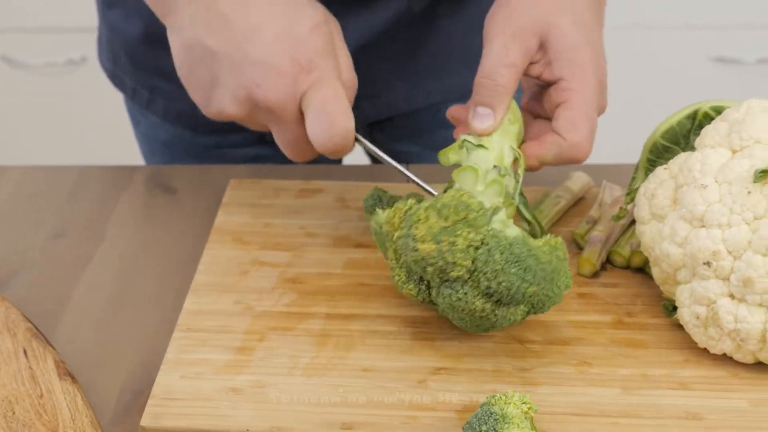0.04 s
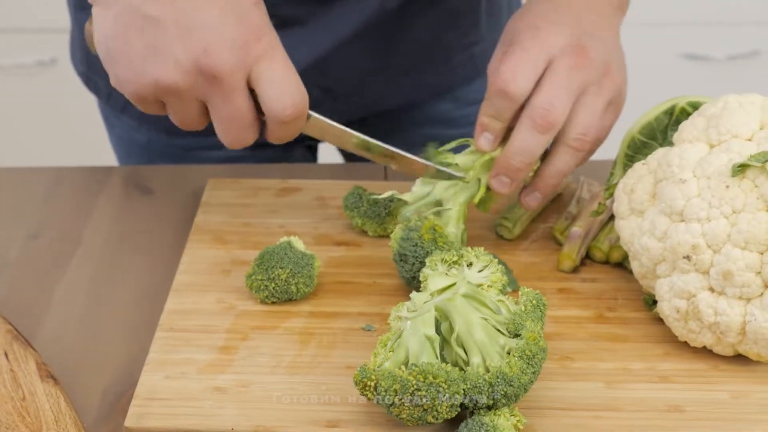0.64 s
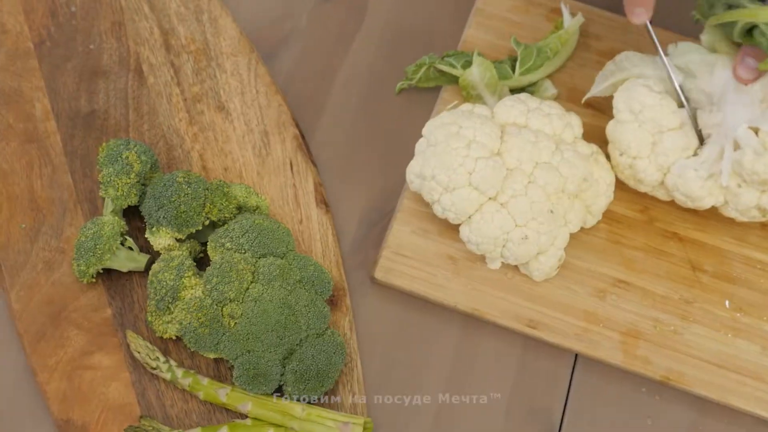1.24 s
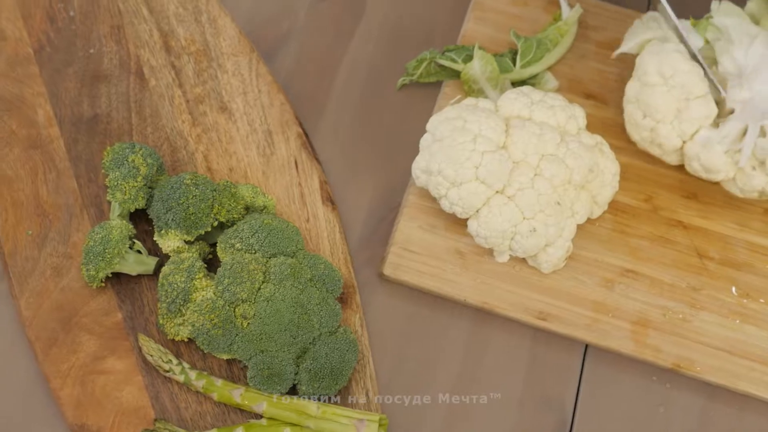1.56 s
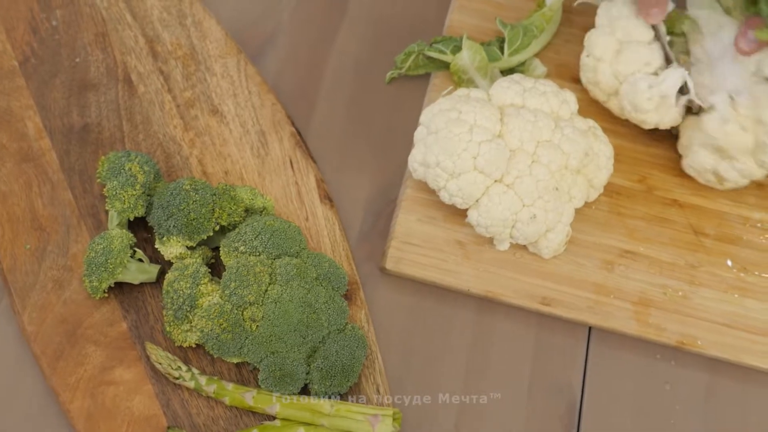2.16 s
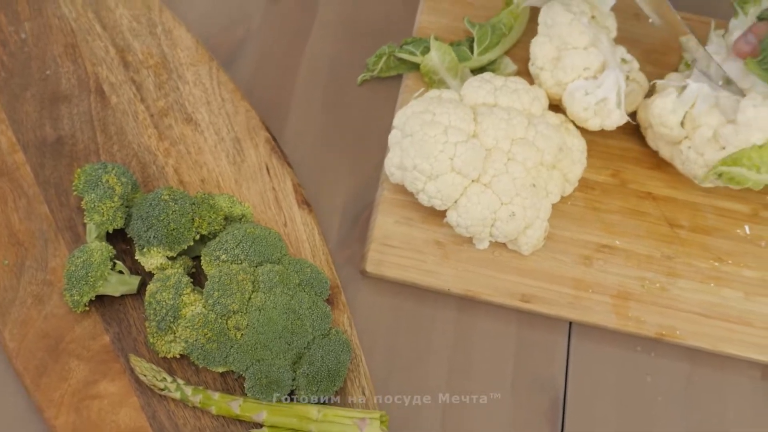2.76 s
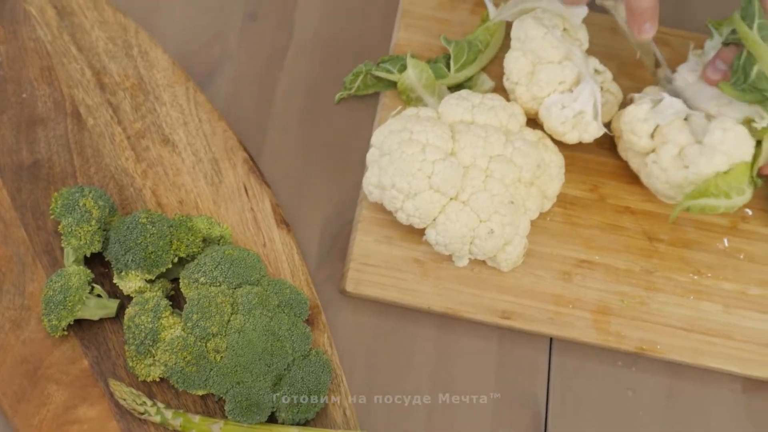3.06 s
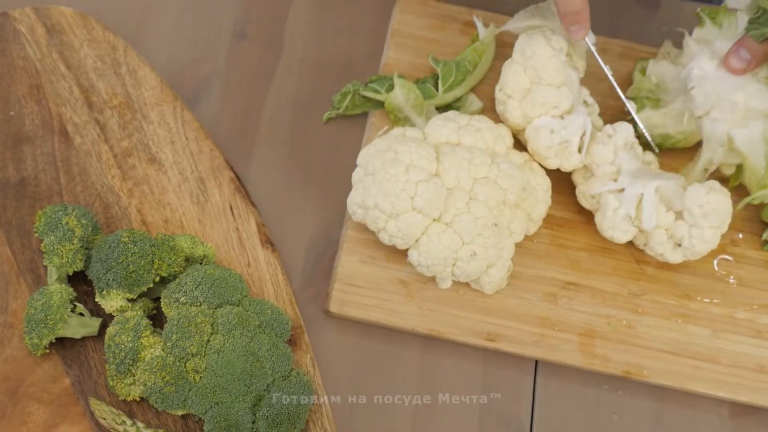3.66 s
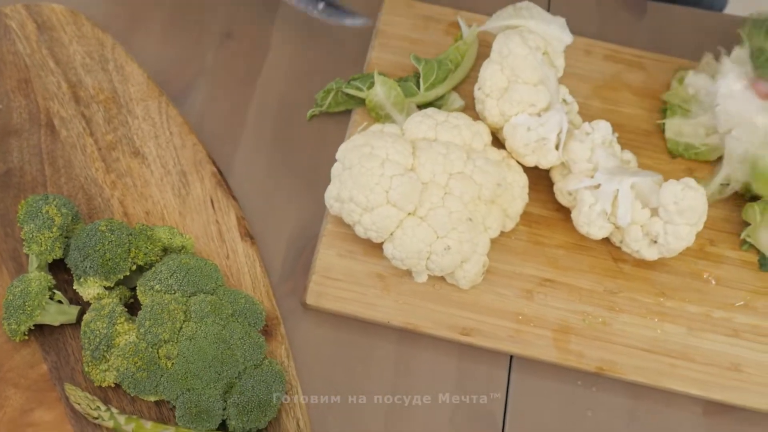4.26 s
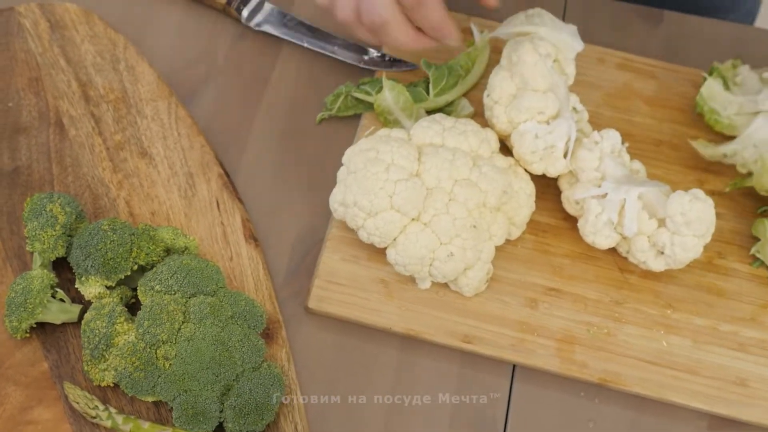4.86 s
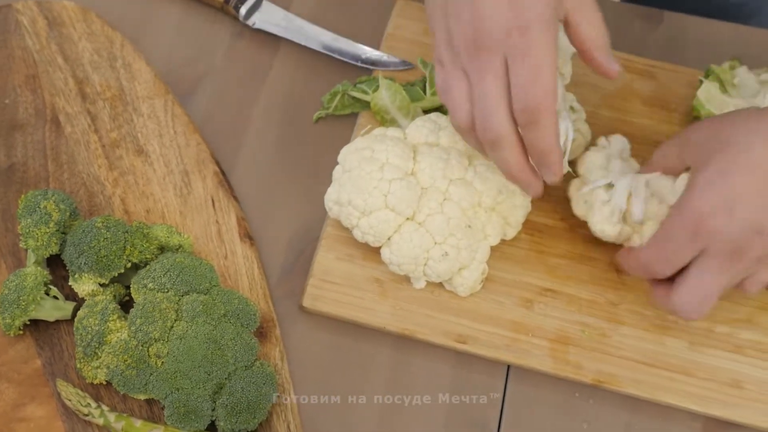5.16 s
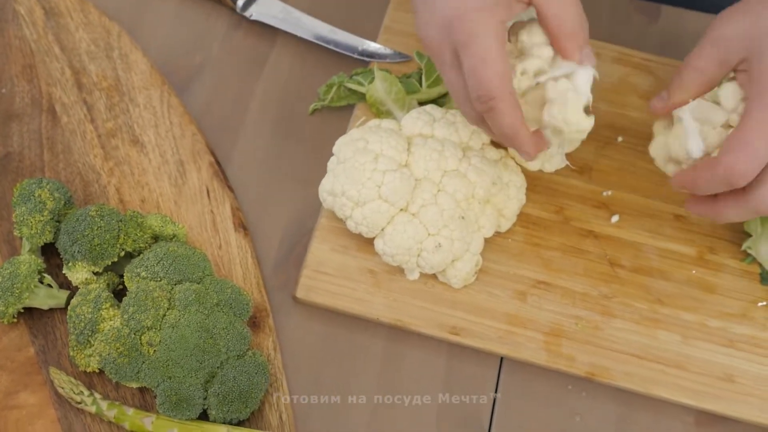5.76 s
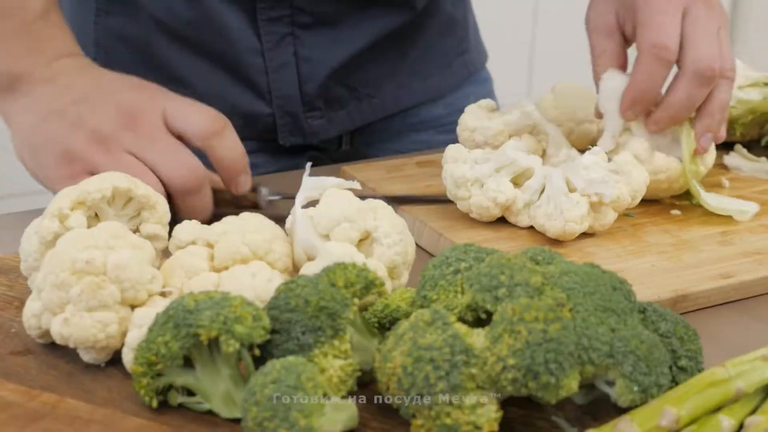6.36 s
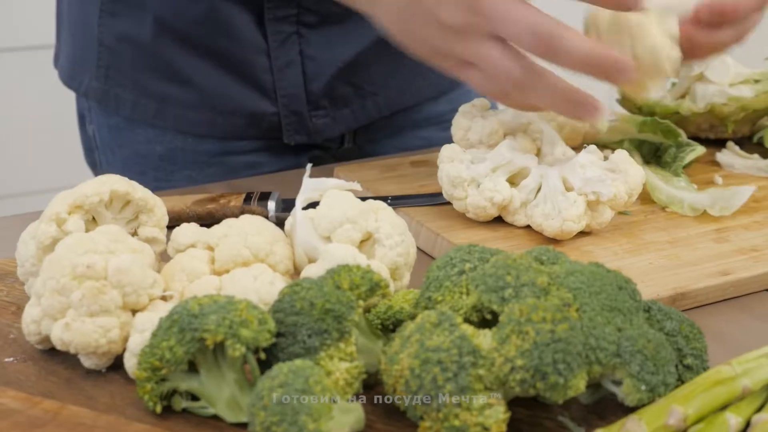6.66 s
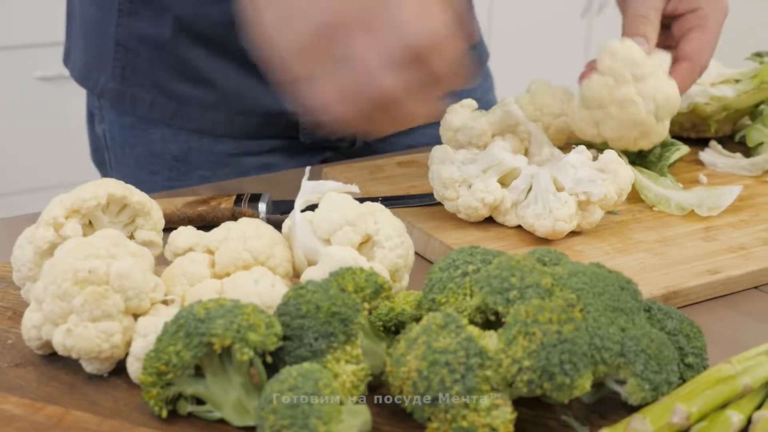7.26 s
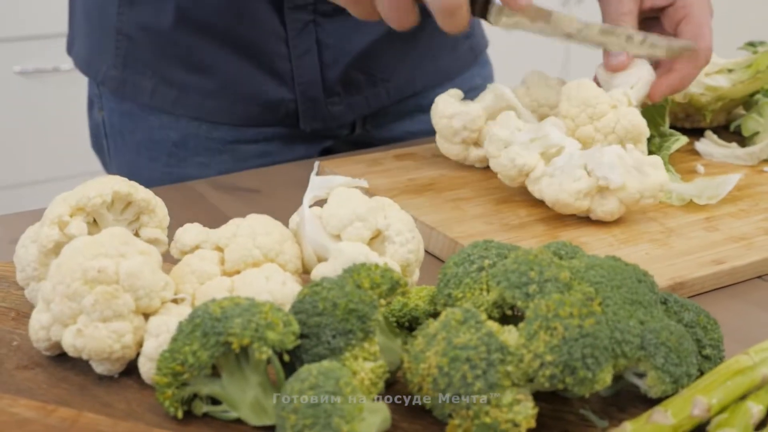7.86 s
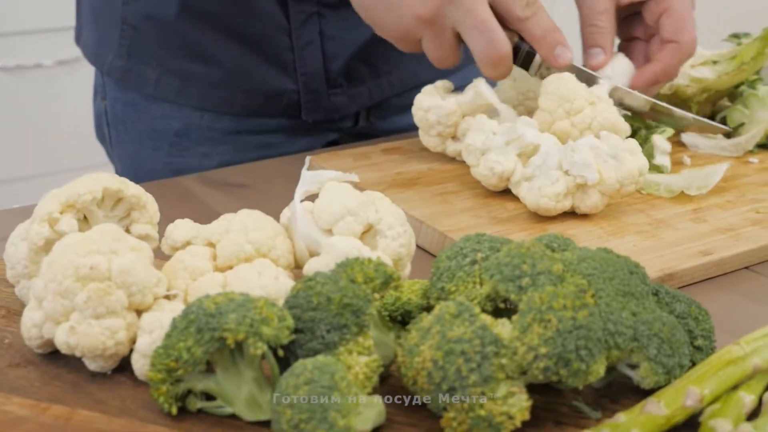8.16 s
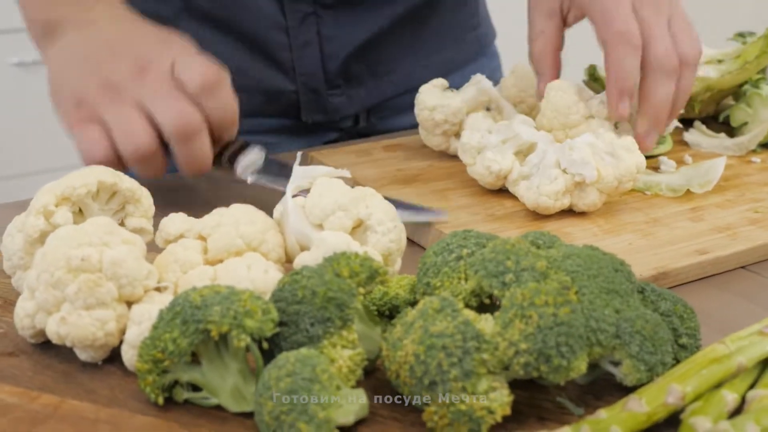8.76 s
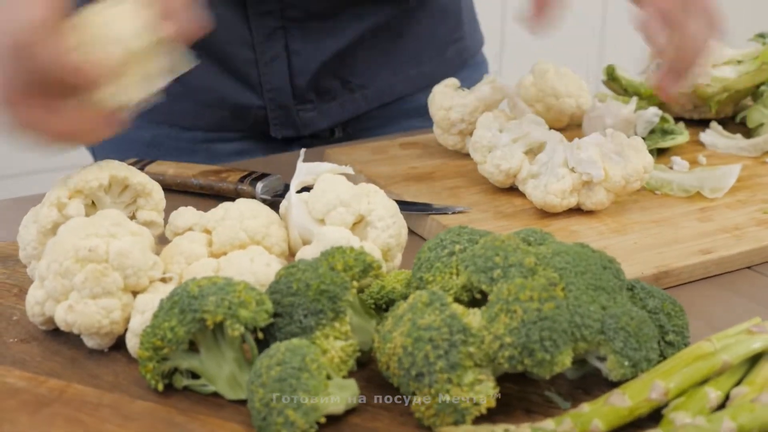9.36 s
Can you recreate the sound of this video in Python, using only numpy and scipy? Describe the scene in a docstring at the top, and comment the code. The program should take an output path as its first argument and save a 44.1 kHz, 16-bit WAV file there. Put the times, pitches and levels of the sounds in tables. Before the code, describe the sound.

A quiet kitchen holds a faint steady fan, a low electrical hum and a thin whine. From the start to about 3.5 seconds, a knife cuts broccoli and cauliflower stalks with faint, irregular crunches, a few tiny squeaks of the blade and dull, hollow bumps on a wooden board. At about 4.5 seconds the knife is laid down with a short clatter of steel on wood. A soft bump follows, then small crisp snaps around 5.6 seconds as a floret is broken by hand. At 6.4 seconds a soft push and two quick dry taps run into one loud, close knock that briefly rings the table, the loudest sound. The knife is picked up with light knocks at 7.5 seconds, and two very faint cuts and soft bumps follow until 8.4. Near 9 seconds the knife is set down again, rattling and knocking on the wood.

```python
"""A quiet kitchen: broccoli and cauliflower are cut and snapped into florets on a wooden board.
Stalks crunch faintly as their cells burst, and squeak on the blade. Board and table give dull bumps.
The knife is laid down twice, ringing steel and wood. A soft push and two dead taps lead into
one loud, close knock that rings the table. Mains hum, a faint fan and a thin whine lie underneath."""
import sys
import numpy as np
from scipy import signal
from scipy.fft import rfft, irfft, next_fast_len
from scipy.io import wavfile

SR = 44100
rng = np.random.default_rng(int(sys.argv[2]) if len(sys.argv) > 2 else 0)


def wav_out(sig):
    """Save sig, one row per channel (or a flat mono array), as 16-bit PCM at SR to the path in sys.argv[1]."""
    wavfile.write(sys.argv[1], SR, np.round(np.clip(np.atleast_2d(sig).T, -1, 1) * 32767).astype(np.int16))


N = 424241
TOP_HZ = 15800
EVENT_TIME_S = np.arange(-int(.1 * SR), int(.33 * SR)) / SR  # zero at the event's peak

# noise spectra, shape only: freq_hz, density_db
AIR_SPECTRUM = [(15, -27.5), (28, -18), (50, -14), (70, -10.5), (95, -1.5), (150, -6.5), (220, -10.5),
                (400, -7.5), (650, -9), (1050, -9), (1700, -14.5), (3200, -16.5), (4200, -17.5),
                (7100, -20.5), (9500, -23), (11500, -28), (15500, -31)]
CELL_SPECTRUM = [(100, -3), (400, -4), (900, -5), (2200, -2.5), (3400, -1), (4600, -3.5), (7500, -3),
                 (11000, -11), (15500, -20)]
WOOD_SPECTRUM = [(50, -28.5), (125, -13), (190, -23.5), (340, -2), (460, -7.5), (640, 0.5), (950, -1),
                 (1250, -1.5), (1900, -17.5), (3300, -7.5), (4700, -30.5), (8500, -13.5), (12000, -13),
                 (16000, -54)]
HOLLOW_SPECTRUM = [(120, -20), (220, -16), (330, -3), (420, -5), (560, -13), (1100, -28)]
STEEL_SPECTRUM = [(500, -37), (1400, 2), (2000, 3.5), (3600, 1.5), (4900, -6), (5800, 0.5), (7200, -16.5),
                  (9000, -3), (12000, -34), (16000, -31.5)]
CRACKLE_SPECTRUM = [(40, -21), (200, -3), (700, 9.5), (1500, -9), (4000, -8.5), (8000, -18), (16000, -19)]
KNOCK_SPECTRUM = [(50, -32.5), (125, -13), (190, -12.5), (300, -9), (400, -11), (560, 7), (720, -3.5),
                  (980, -4.5), (1350, -2.5), (1550, -5), (1950, -12.5), (3800, -14), (5200, -24.5),
                  (8500, -33), (11500, -45.5), (16000, -52)]
# left-right likeness of air, roomy sound and near sound: freq_hz, correlation
AIR_CORRELATION = [(60, 0.68), (150, 0.29), (380, 0.09), (950, 0.075), (2380, 0.036), (5980, 0.045),
                   (15000, 0.03)]
ROOM_CORRELATION = [(60, 0.56), (200, -0.12), (1000, 0.012), (8000, 0.024)]
NEAR_CORRELATION = [(700, 1), (1300, .999), (2400, .93), (4400, 0.81), (8000, 0.52), (15000, 0.589)]
# clear modes of board and table, and of the blade: freq_hz, relative_db, base_t60_s
BOARD_MODES = [(127.3, -14.5, 0.27), (331.2, -9.5, 0.39), (367, -8.5, 0.34), (400.4, -1, 0.29),
               (533, -1, 0.28), (547, -2.5, 0.254), (619, 2, 0.21), (653.4, -7, 0.39), (737, 6, 0.3),
               (835, -1, 0.26), (915, -17.5, 0.18), (997, -19, 0.46), (1134, -9.5, 0.41),
               (1153, -2.5, 0.32), (1361, 0, 0.22), (1554, -3.5, 0.19)]
BLADE_MODES = [(1335, -11, 0.18), (1396, 1, 0.21), (2213, -4, 0.1), (2370, -9, .17), (2600, -7, .13),
               (2880, -18, 0.18), (3200, -10, 0.13), (3500, -6, .06), (3590, -1, 0.071), (3950, -12, .11),
               (6020, -23, .06), (6050, -9, .07), (7370, -27, .1), (8470, -20, 0.09)]
# ring time of wood and room: freq_hz, base_t60_s
RING_DECAY = [(100, .36), (400, 0.3), (1000, 0.34), (3000, 0.29), (7000, 0.26), (12000, .16)]
# fan resonances: centre_hz, width_hz, lift_db
FAN_RESONANCES = [(356, 17, 6), (601.4, 9.42, 12), (864, 55, 12), (987, 24, 10), (1034, 31, 7),
                  (1069, 33, 5), (1158, 25, 6), (1470, 6.1, 0), (2290, 190, 1), (3852, 110, 7),
                  (4997, 77, 5), (5620, 440, 4.5), (7040, 1200, -4.5), (7780, 200, 6), (9600, 1000, 8),
                  (10900, 50.3, 6), (15100, 4400, 4.5)]
# swell of the whine: time_s, relative_db
WHINE_ENVELOPE = [(0.0, -2.5), (2.2, -0.5), (3.6, -12.5), (4.8, 3), (6.2, -20), (6.6, -3.0), (7.6, 1),
                  (8.6, -3.5), (9.6, -8.0)]
# mains hum: pitch_hz, rms_db
HUM_TONES = [(50, -80.5), (100, -79.5)]
# stalks and leaves giving way: peak_s, level_db, sigma_s, tilt_db_per_octave
STALK_CRACKS = [(0.115, -58.5, 0.031, 4), (0.936, -60.5, 0.019, -5.5), (1.15, -57, 0.019, -3.5),
                (1.411, -62.5, 0.042, -3), (1.939, -53.5, 0.019, -1.5), (2.132, -59, .023, -0.5),
                (2.459, -59, .046, -1.5), (2.923, -54.5, 0.029, -1.5), (3.129, -56, .024, -0.5),
                (3.407, -56.5, 0.028, 1), (4.487, -59.5, 0.025, 7), (5.561, -62.5, 0.018, 1),
                (5.658, -51.5, 0.0069, 7.5), (5.703, -58.5, 0.0091, 8.5), (8.148, -65, 0.029, 4.5),
                (8.353, -65, .024, 1)]
# blade in a wet stalk: peak_s, level_db, pitch_hz
BLADE_SQUEAKS = [(0.102, -60.5, 3640), (0.136, -63, 3150), (0.912, -64, 3270), (2.835, -64, 3230),
                 (2.905, -66, 3320), (3.369, -64.5, 3450)]
# dull, hollow bumps on board and table: peak_s, level_db, rise_s, cutoff_hz
BOARD_BUMPS = [(0.129, -60.5, .018, 394), (0.200, -60.5, .007, 150), (0.258, -66, .007, 280),
               (0.385, -65, 0.025, 450), (0.935, -67, .015, 520), (1.170, -64, .016, 280),
               (1.389, -62, .034, 317), (2.456, -62, 0.025, 300), (4.519, -45, 0.0064, 230),
               (5.087, -54.5, 0.015, 300), (5.648, -53, .0012, 1400), (6.351, -50, 0.012, 850),
               (7.855, -59, 0.01, 444), (8.411, -56, 0.0097, 420), (9.568, -61.5, 0.016, 128)]
# knife laid down, picked up, laid down: peak_s, level_db, rise_s, cutoff_hz, clatter_db
KNIFE_CONTACTS = [(4.420, -57, .011, 1500, -5), (4.458, -50, 0.02, 517, -8),
                  (4.517, -30.5, 0.0061, 3000, -9.5), (7.501, -48, .021, 700, -22),
                  (7.547, -51, 0.0087, 646, -14), (7.579, -53.5, 0.0098, 420, -12.5),
                  (8.786, -44.5, 0.0038, 1800, -0.5), (8.853, -41, 0.023, 1600, -6.5),
                  (8.888, -38.5, 0.029, 810, -16), (8.944, -31.5, 0.0072, 1110, -19.5),
                  (8.965, -27.5, 0.0067, 1190, -16)]
# dead taps: start_s, touch_db, full_contact_db, pitch_hz
DEAD_TAPS = [(6.3459, -28, -27.5, 680), (6.4091, -22.5, -11, 1357)]


def from_db(db):
    """Decibels to gain."""
    return 10 ** (np.asarray(db) / 20)


def unit_rms(x):
    """Scale to rms 1."""
    return x / np.sqrt(np.mean(x ** 2) + 1e-30)


def bins_hz(size):
    """Frequencies of a real FFT."""
    return np.arange(size // 2 + 1) * SR / size


def at_hz(points, hz):
    """Read a table on a log-frequency axis."""
    freqs, values = np.transpose(points)
    return np.interp(np.log(np.maximum(hz, 1)), np.log(freqs), values)


def add(out, sound, start_s):
    """Mix a sound into out."""
    start = int(round(start_s * SR))
    first, last = max(start, 0), min(start + sound.shape[-1], N)
    out[:, first:last] += sound[..., first - start:last - start]


def decay(t, t60_s):
    """Free decay from time zero."""
    return np.exp(-np.log(1000) * np.maximum(t, 0) / t60_s)


def attack(rise_s):
    """Soft onset: the sound swells up to its peak."""
    return np.exp(np.minimum(EVENT_TIME_S, 0) / rise_s)


def white_spectra(size):
    """Spectra of two independent white noises."""
    return rfft(rng.standard_normal((2, size)))


def stereo(pair, correlation):
    """Mix two independent signals into correlated left and right."""
    mid, side = np.sqrt(1 + correlation) * pair[0], np.sqrt(1 - correlation) * pair[1]
    return np.array([mid + side, mid - side])


def ripple(hz, depth_db, spacing_hz):
    """Reflections add and cancel: narrow spectral peaks and dips."""
    steps = rng.standard_normal(4000)
    return from_db(depth_db * np.interp(hz / spacing_hz, np.arange(len(steps)), steps))


def resonance(hz, centre_hz, width_hz):
    """Bell curve, height 1."""
    return 1 / (1 + (2 * (hz - centre_hz) / width_hz) ** 2)


def fan(rms_db=-63.5):
    """Steady air noise shaped by the fan's resonances."""
    size = next_fast_len(N, True)
    hz = bins_hz(size)
    lift_db = sum(db * resonance(hz, centre_hz, width_hz) for centre_hz, width_hz, db in FAN_RESONANCES)
    air = stereo(white_spectra(size), at_hz(AIR_CORRELATION, hz))
    air *= ripple(hz, depth_db=3.5, spacing_hz=22.045) * from_db(at_hz(AIR_SPECTRUM, hz) + lift_db)
    return from_db(rms_db) * unit_rms(irfft(air, size)[:, :N])


def whine(pitch_hz=1096, width_hz=8, rms_db=-75):
    """A thin band of noise swells and fades."""
    size = next_fast_len(N, True)
    tone = irfft(white_spectra(size) * resonance(bins_hz(size), pitch_hz, width_hz), size)[:, :N]
    swell = from_db(np.interp(np.arange(N) / SR, *np.transpose(WHINE_ENVELOPE)))
    return from_db(rms_db) * unit_rms(tone * swell)


def hum():
    """Mains tone and its octave."""
    t = np.arange(N) / SR
    return sum(np.sqrt(2) * from_db(db) * np.sin(2 * np.pi * (hz * t + rng.random()))
               for hz, db in HUM_TONES)


def cracks(cells_per_s=900, spread_db=3.5, room_t60_s=0.073):
    """A tearing stalk bursts a swarm of cells; each pop trails off in early echoes."""
    out, size = np.zeros((2, N)), len(EVENT_TIME_S)
    hz = bins_hz(size)
    energy_feedback = decay(1 / SR, room_t60_s) ** 2
    octaves = np.log2(np.maximum(hz, 1500) / 1500)
    for peak_s, level_db, sigma_s, tilt_db_per_octave in STALK_CRACKS:
        strain = np.exp(-.5 * (EVENT_TIME_S / sigma_s) ** 2)
        bursts = rng.random(size) < cells_per_s / SR
        pops = strain * bursts * from_db(spread_db * np.minimum(rng.exponential(1, size), 3))
        energy = signal.lfilter([1], [1, -energy_feedback], pops ** 2 + 1e-18)
        spectrum = rfft(np.sqrt(energy) * rng.standard_normal((2, size)))
        spectrum *= from_db(at_hz(CELL_SPECTRUM, hz) + tilt_db_per_octave * octaves)
        spectrum *= ripple(hz, depth_db=5.5, spacing_hz=208)
        crunch = unit_rms(irfft(spectrum, size)) * np.sqrt(np.mean(strain ** 2))
        add(out, from_db(level_db) * crunch, peak_s + EVENT_TIME_S[0] - room_t60_s / 20)
    return out


def squeaks(sigma_s=0.014, width_hz=560):
    """Steel sticks and slips in the stalk: a short, rough tone."""
    out, size = np.zeros((2, N)), len(EVENT_TIME_S)
    envelope = np.exp(-.5 * (EVENT_TIME_S / sigma_s) ** 2)
    for peak_s, level_db, pitch_hz in BLADE_SQUEAKS:
        tone = unit_rms(irfft(white_spectra(size) * resonance(bins_hz(size), pitch_hz, width_hz), size))
        add(out, from_db(level_db) * tone * envelope, peak_s + EVENT_TIME_S[0])
    return out


def softness(hz, cutoff_hz):
    """A soft contact excites little above its cutoff."""
    return 1 / np.sqrt(1 + (hz / cutoff_hz) ** 4)


def dense_ring(spectrum, correlation, cutoff_hz, t60_scale):
    """Overlapping modes as third-octave noise bands, each with its own decay; starts near rms 1."""
    edges_hz = 45 * 2 ** (np.arange(27) / 3)
    centres_hz = np.sqrt(edges_hz[1:] * edges_hz[:-1])
    gains = from_db(at_hz(spectrum, centres_hz)) * softness(centres_hz, cutoff_hz) * np.sqrt(centres_hz)
    gains /= np.linalg.norm(gains)
    size = next_fast_len(len(EVENT_TIME_S), True)
    hz = bins_hz(size)
    noise = stereo(white_spectra(size), at_hz(correlation, hz))
    noise *= ripple(hz, depth_db=5.5, spacing_hz=59.9)
    out, ringing = 0, EVENT_TIME_S > 0
    for low_hz, high_hz, centre_hz, gain in zip(edges_hz, edges_hz[1:], centres_hz, gains):
        envelope = decay(EVENT_TIME_S, t60_scale * at_hz(RING_DECAY, centre_hz))
        band = irfft(noise * ((hz >= low_hz) & (hz < high_hz)), size)[:, :len(envelope)] * envelope
        out += gain * band * np.sqrt(np.mean(envelope[ringing] ** 2) / np.mean(band[:, ringing] ** 2))
    return out


def clear_ring(modes, cutoff_hz, t60_scale, scatter_db=2.5, channels=2):
    """Decaying sines, new strengths at each strike; starts at rms 1."""
    hz, db, t60_s = np.transpose(modes)[:, :, None]
    gains = from_db(db + scatter_db * rng.standard_normal(db.shape)) * softness(hz, cutoff_hz)
    phases = rng.uniform(0, 2 * np.pi, (channels, len(hz), 1))
    rings = gains * np.sin(2 * np.pi * hz * EVENT_TIME_S + phases) * decay(EVENT_TIME_S, t60_scale * t60_s)
    return np.sqrt(2) * rings.sum(axis=1) / np.linalg.norm(gains)


def wood_blow(cutoff_hz, t60_scale, modes_db=-2.5):
    """One blow on board and table, spread wide by the room."""
    dense = dense_ring(WOOD_SPECTRUM, ROOM_CORRELATION, cutoff_hz, t60_scale)
    return dense + from_db(modes_db) * clear_ring(BOARD_MODES, cutoff_hz, t60_scale)


def bumps(board_db=-2.0, hollow_db=-2.5):
    """Dull, hollow bumps on board and table; the slower the rise, the longer the wood sounds."""
    out = np.zeros((2, N))
    for peak_s, level_db, rise_s, cutoff_hz in BOARD_BUMPS:
        board = wood_blow(cutoff_hz, t60_scale=.85 + 38 * rise_s)
        hollow = dense_ring(HOLLOW_SPECTRUM, ROOM_CORRELATION, cutoff_hz, t60_scale=0.72)
        bump = from_db(board_db) * board + from_db(hollow_db) * hollow
        add(out, from_db(level_db) * bump * attack(rise_s), peak_s + EVENT_TIME_S[0])
    return out


def knife(rattle_db=-1.0, ring_db=6.0, t60_scale=0.83):
    """Knife on wood: the blade rings when it touches alone, mostly rattles when the handle lands too."""
    out = np.zeros((2, N))
    for peak_s, level_db, rise_s, cutoff_hz, clatter_db in KNIFE_CONTACTS:
        rattle = from_db(rattle_db) * dense_ring(STEEL_SPECTRUM, ROOM_CORRELATION, TOP_HZ, t60_scale=0.82)
        ring = from_db(ring_db + .6 * clatter_db) * clear_ring(BLADE_MODES, TOP_HZ, t60_scale)
        strike = wood_blow(cutoff_hz, t60_scale) + from_db(clatter_db) * (rattle + ring)
        add(out, from_db(level_db) * strike * attack(rise_s), peak_s + EVENT_TIME_S[0])
    return out


def dead_contact(pitch_hz, t60_s=.014, cutoff_hz=6500, crackle_db=-7, low_hz=70.1):
    """A damped tone with dry crackle, with no deep bass."""
    t = EVENT_TIME_S[EVENT_TIME_S >= 0]
    colour = from_db(at_hz(CRACKLE_SPECTRUM, bins_hz(len(t))))
    crackle = unit_rms(irfft(rfft(rng.standard_normal(len(t))) * colour, len(t)))
    tap = (np.cos(2 * np.pi * pitch_hz * t) + from_db(crackle_db) * crackle) * decay(t, t60_s)
    band = signal.butter(2, [low_hz, cutoff_hz], "band", fs=SR, output="sos")
    return signal.sosfilt(band, tap + 1e-18)


def taps(push_s=6.3345, push_db=-38, seat_delay_s=0.0051, overtone_hz=3850, overtone_db=-8.5):
    """A soft push, then two taps: each a bright touch, then full contact with a hard overtone."""
    out = np.zeros((2, N))
    push = dead_contact(pitch_hz=120, t60_s=0.051, cutoff_hz=270, crackle_db=-16)
    add(out, from_db(push_db) * push, push_s)
    for start_s, touch_db, full_contact_db, pitch_hz in DEAD_TAPS:
        touch = dead_contact(pitch_hz, t60_s=.012, cutoff_hz=16000, crackle_db=-2)
        add(out, from_db(touch_db) * touch, start_s)
        full_contact = dead_contact(pitch_hz) + from_db(overtone_db) * dead_contact(overtone_hz)
        add(out, from_db(full_contact_db) * full_contact, start_s + seat_delay_s)
    return out


def knock(peak_s=6.4135, rise_s=.0038, dense_db=-19.5, modes_db=-22.5, t60_scale=0.93):
    """A close, centred knock at the second tap rings the whole table."""
    out = np.zeros((2, N))
    dense = from_db(dense_db) * dense_ring(KNOCK_SPECTRUM, NEAR_CORRELATION, TOP_HZ, t60_scale)
    modes = from_db(modes_db) * clear_ring(BOARD_MODES, TOP_HZ, t60_scale, scatter_db=1.2, channels=1)
    add(out, (dense + modes) * attack(rise_s), peak_s + EVENT_TIME_S[0])
    return out


def scene():
    """Stereo sum of the kitchen's sounds."""
    return fan() + whine() + hum() + cracks() + squeaks() + bumps() + knife() + taps() + knock()


def record(dry):
    """Steep low-pass at TOP_HZ."""
    return signal.sosfilt(signal.ellip(10, .1, 70, TOP_HZ, fs=SR, output="sos"), dry)


dry = scene()
out = record(dry)
wav_out(out)
```